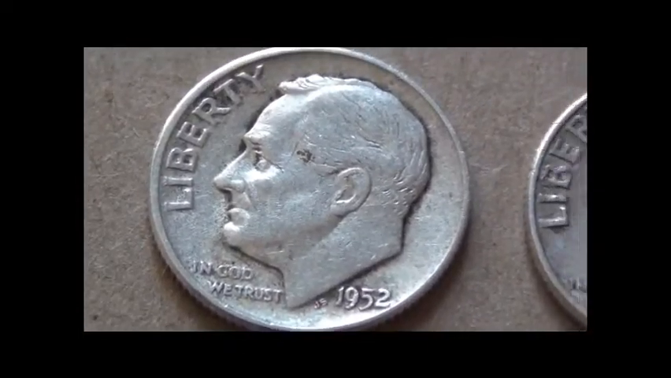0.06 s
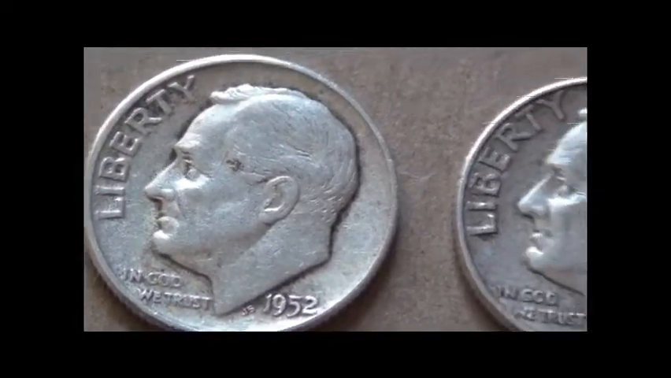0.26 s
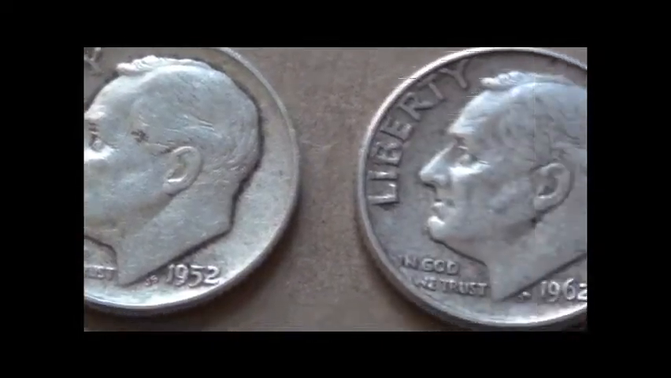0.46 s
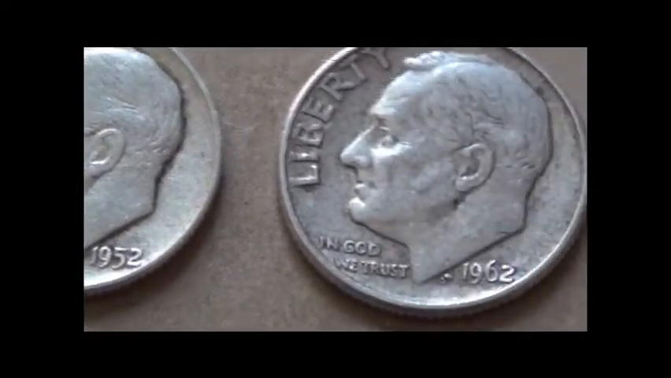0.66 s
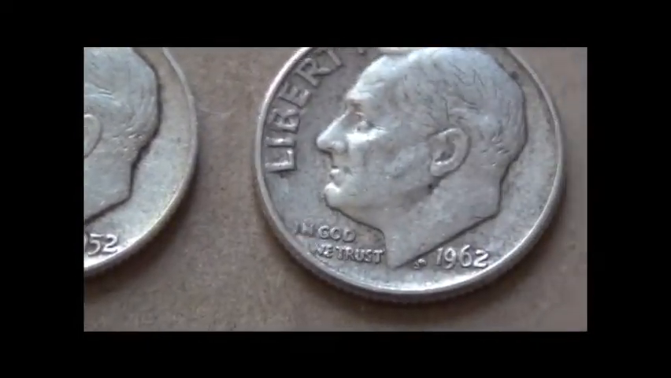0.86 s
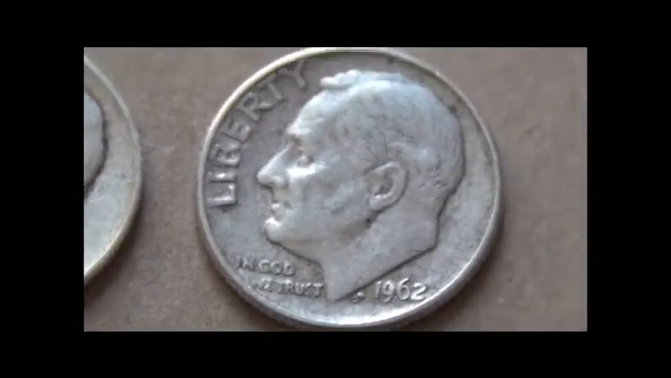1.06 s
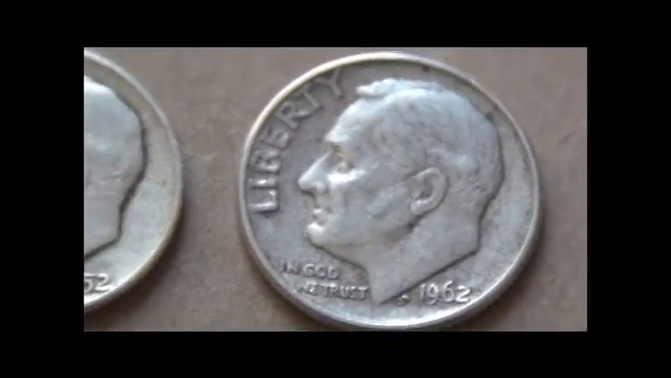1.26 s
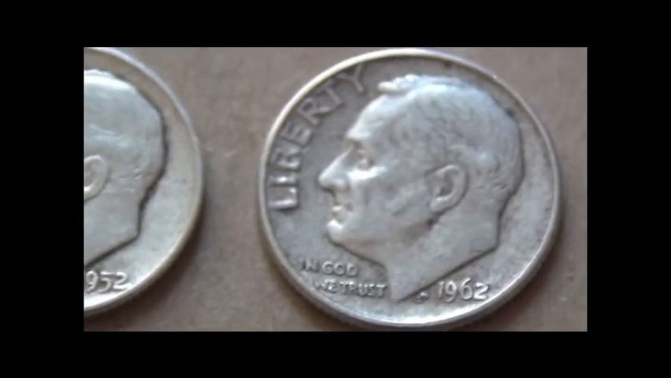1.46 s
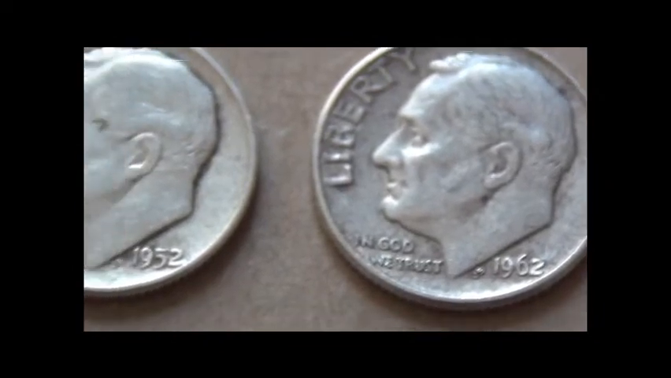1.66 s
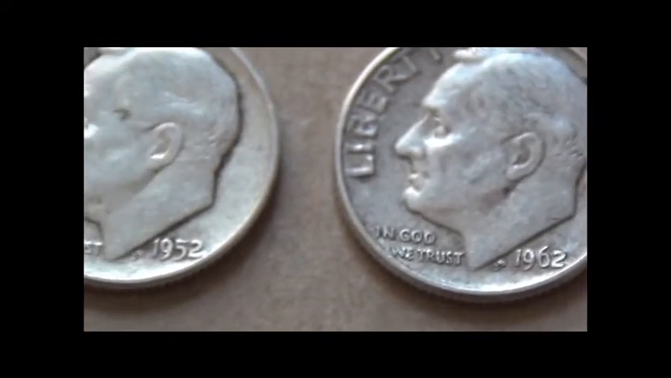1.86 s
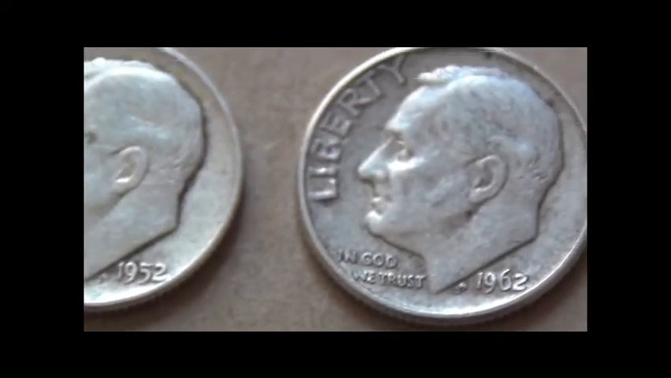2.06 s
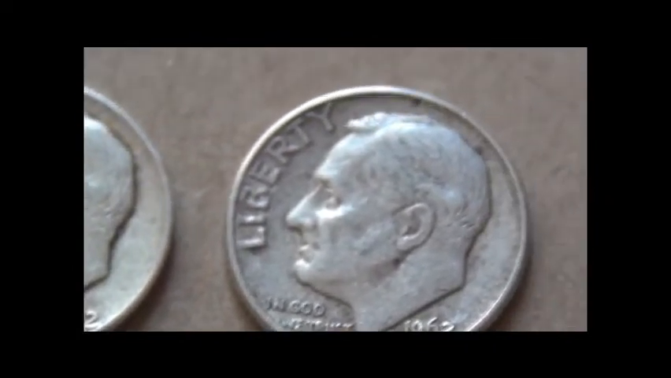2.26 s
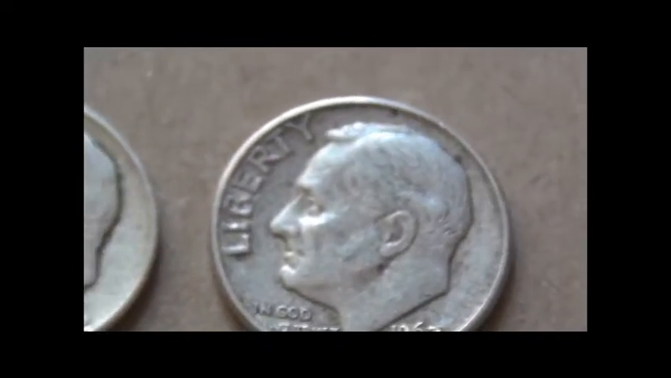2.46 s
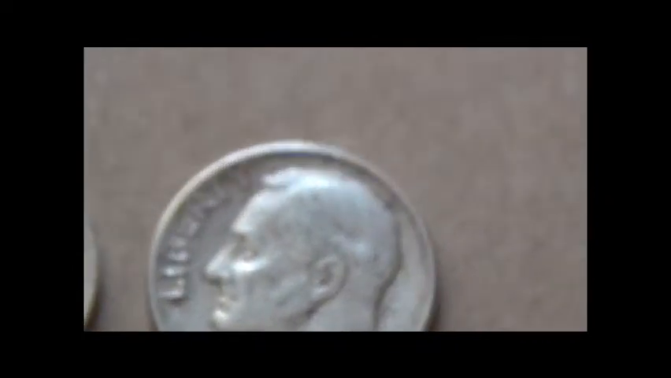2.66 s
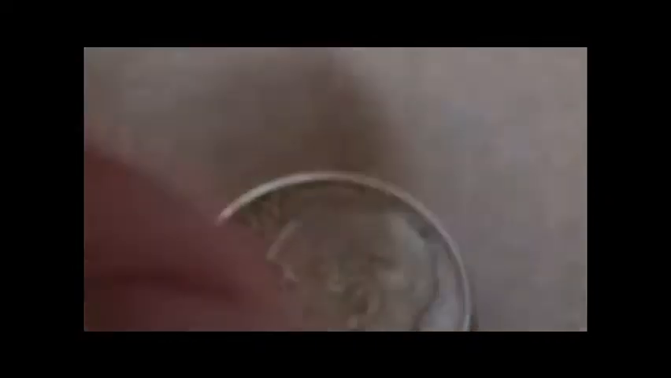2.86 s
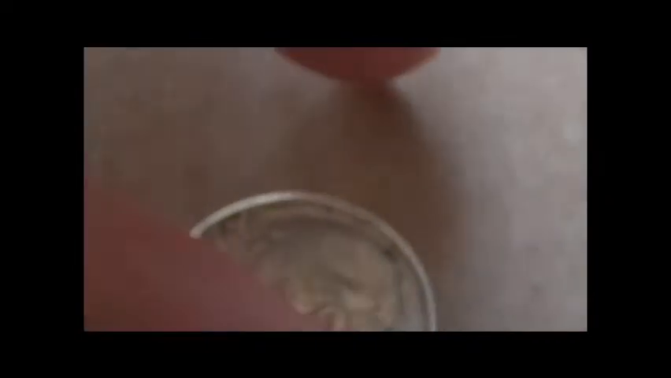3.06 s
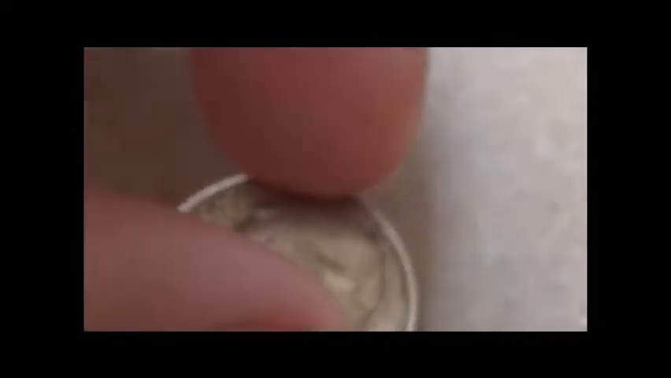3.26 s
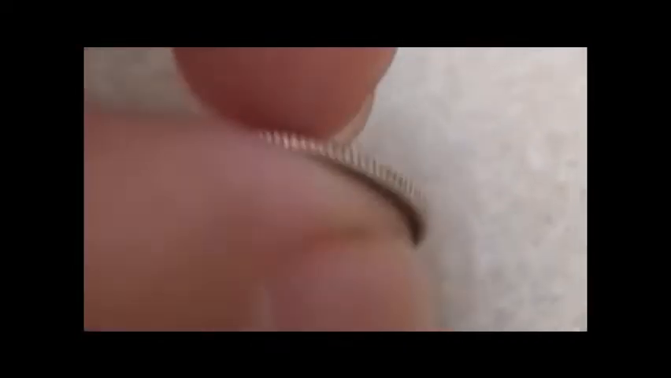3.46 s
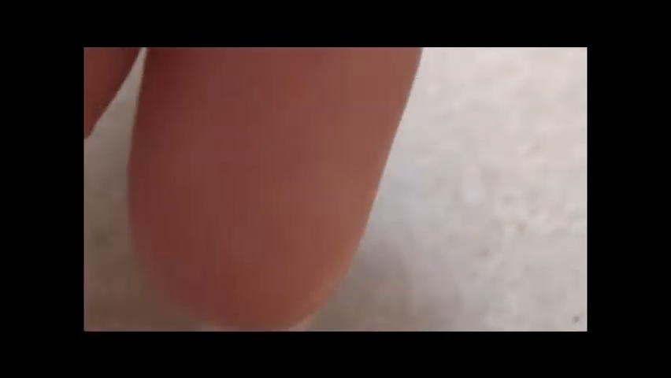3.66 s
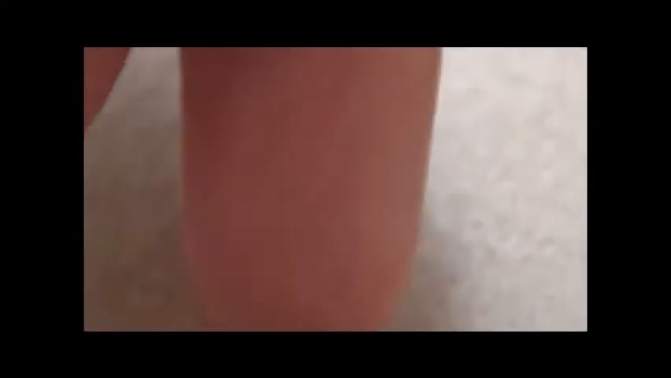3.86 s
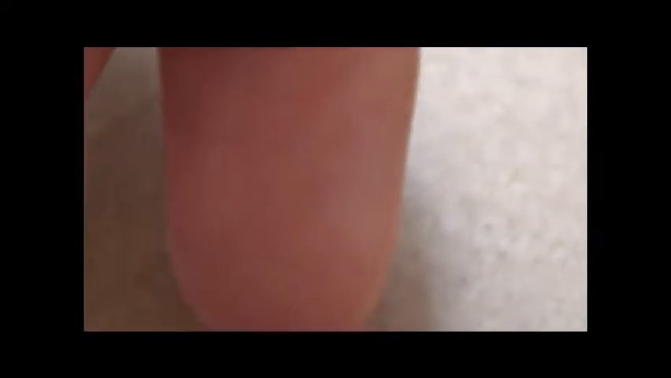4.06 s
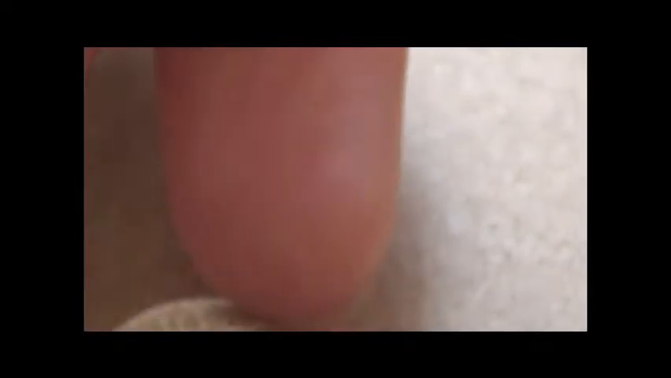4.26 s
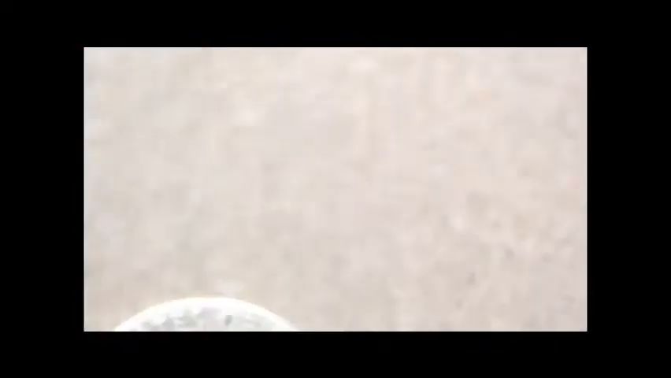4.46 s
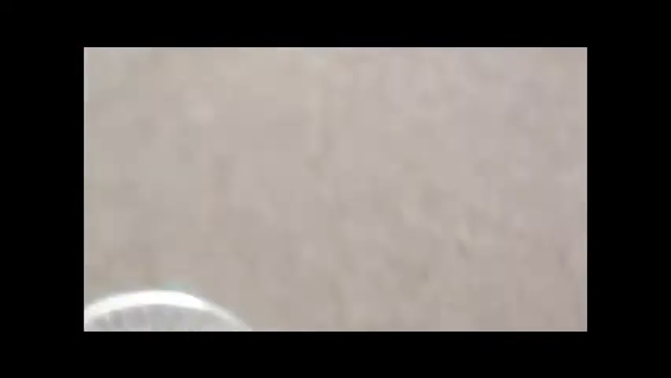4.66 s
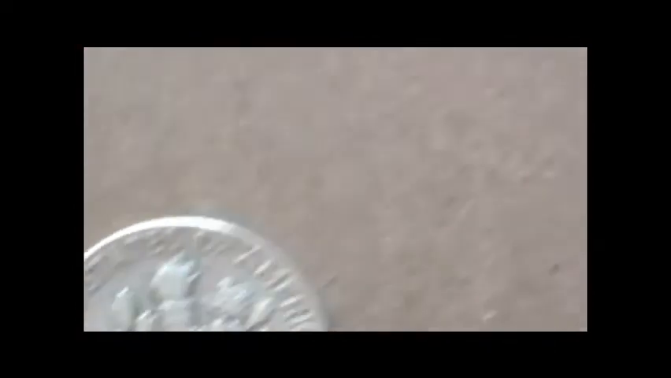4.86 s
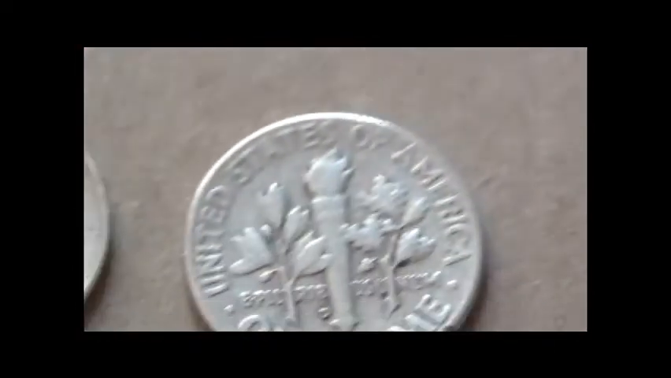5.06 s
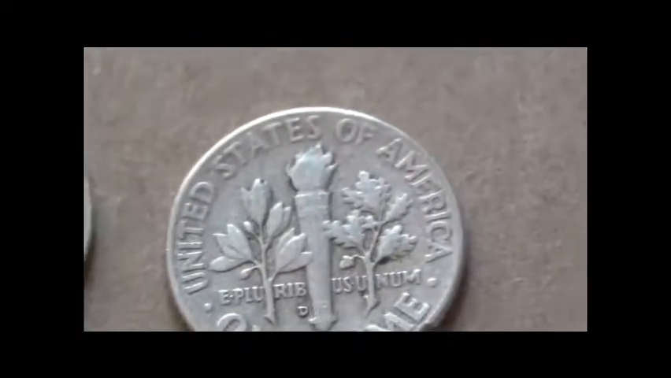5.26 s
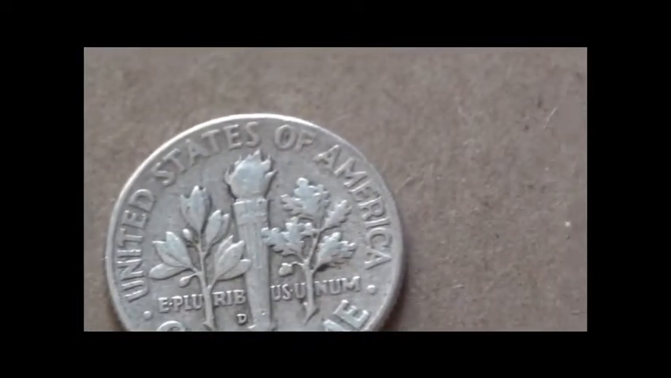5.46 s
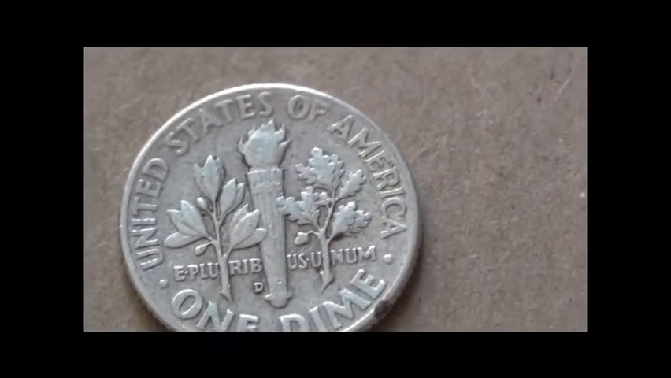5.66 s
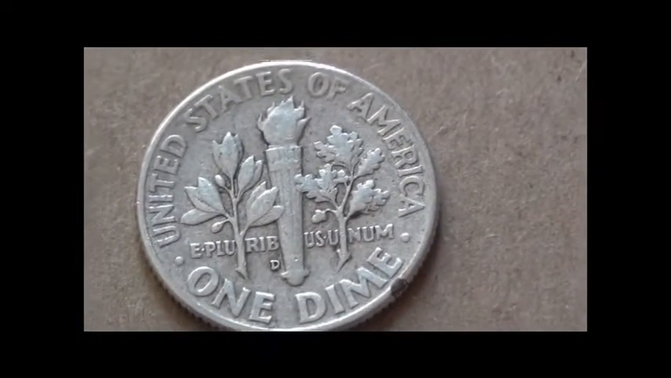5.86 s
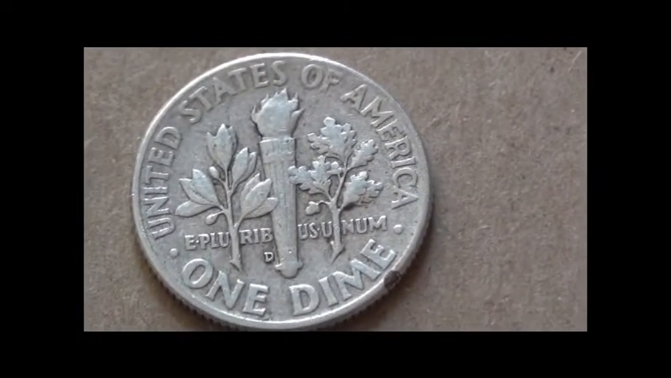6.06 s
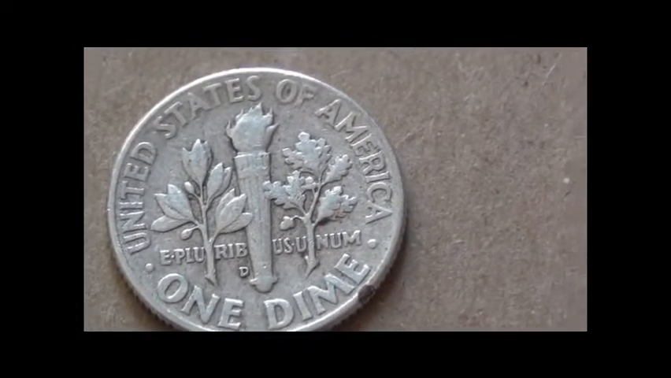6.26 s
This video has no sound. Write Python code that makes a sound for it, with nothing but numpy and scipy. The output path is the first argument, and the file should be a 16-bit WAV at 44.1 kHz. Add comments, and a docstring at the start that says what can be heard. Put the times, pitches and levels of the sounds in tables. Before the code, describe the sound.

Quiet room hiss with faint camera whirr, a dull bump, then a small coin scraped, knocked and dropped on cardboard with a tiny bright chime.

```python
"""A quiet room, a sheet of cardboard on a table, a hand-held camera close by with its own stereo microphone.
A small silver coin is picked up, turned over and dropped: knocks and slipping clicks ring the modes of the board,
and the coin's own modes chime briefly when it falls free. Skin brushes along as shaped noise.
Low pushes thud through the support, the camera's case ticks, its lens drive sings as it refocuses twice, its electronics pip.
The drop pushes the limiter down, so the steady hiss stays lower after it."""
import sys
import numpy as np
from scipy import signal
from scipy.fft import rfft, irfft
from scipy.io import wavfile
from scipy.ndimage import uniform_filter1d, minimum_filter1d

SR = 44100
rng = np.random.default_rng(int(sys.argv[2]) if len(sys.argv) > 2 else 0)


def bounce(signal):
    """Save signal as a 16-bit WAV file at the path given by the first command-line argument."""
    frames = np.transpose(np.atleast_2d(signal))
    limited = np.clip(frames, -1, 1)
    pcm = np.round(limited * 32767).astype(np.int16)
    wavfile.write(sys.argv[1], SR, pcm)


N = 277830
TIME = np.arange(N) / SR  # s
BIN_HZ = np.arange(N // 2 + 1) * SR / N

# Modes of the cardboard on the table. Each row: frequency in Hz, width in Hz, gain in dB.
BOARD_MODES = [(97, 47, 7), (227, 62, 16), (313, 28, 15.5), (450, 26, 1), (554, 136, 17),
               (669.6, 76.5, 23.5), (726, 16, 14), (1266, 104, 11.5), (1460, 270, 18), (1900, 416, 10),
               (2400, 610, 11.5), (3020, 190, 7.5), (4800, 1060, 7), (6740, 650, 4.5), (8780, 1550, 2),
               (13700, 2100, -42)]
# Coin and fingers strike the board. Each row: time in seconds, strength in dB, weight behind the blow in dB,
# hardness in dB per octave.
BOARD_KNOCKS = [(2.492, -33, -7, 3.5), (2.6550, -31, 1, -2.5), (2.9470, -11, 5.5, -10),
                (3.0827, -21.5, 2, -4), (3.1777, -0.5, 5.5, -2), (3.3967, -13, -14, -2.5),
                (3.4726, -5, 6.5, -7.5), (3.5660, -23.5, 13, -2), (3.7530, -20.5, 14.5, -23),
                (3.7580, -19, 3, -22), (3.7770, 10.5, -6.5, -4), (3.8018, 8.5, -10, -3),
                (3.8687, -16, 8.5, -12), (3.8905, -12, 6.5, -28), (4.21, -39, -10, 7), (4.2870, -27, -2, 1),
                (4.3430, -25, -12, -7.5)]
# Rim and fingertips slide on the board. Each row: time of the height in seconds, level in dB,
# rise in seconds, fall in seconds, brightness in dB per octave.
RIM_STROKES = [(3.04, -43, 0.021, 0.0055, -2), (3.173, -31, 0.023, 0.0097, -1),
               (3.262, -49, 0.019, 0.019, 2.5), (3.415, -21, 0.013, 0.0019, 1),
               (3.5, -44.5, .008, 0.0057, 0.5), (3.578, -25.5, 0.0047, 0.018, 0),
               (3.682, -32, 0.022, 0.019, -2.5), (3.755, -37, 0.0031, 0.0055, -2),
               (3.791, -31, 0.0073, 0.018, -1), (3.897, -43.5, 0.044, 0.021, 0.5),
               (4.035, -49.5, 0.016, 0.019, 0), (4.205, -45, 0.024, 0.045, 0)]
# Modes of the free coin. Each row: frequency in Hz, time to die by 60 dB in seconds.
COIN_MODES = [(8640, 0.11), (8885, 0.11), (14960, 0.081)]
# Where the coin is struck decides which mode chimes. Each row: time in seconds, level in dB of each of the three modes.
COIN_CHIMES = [(3.776, -32.5, -35, -27), (3.8018, -41, -48, -50)]
# The hand brushes lightly along. Each row: time of the height in seconds, level in dB, rise in seconds, fall in seconds.
HAND_BRUSHES = [(.77, -52, 0.07, 0.063), (3.105, -53.5, 0.014, 0.018), (4.849, -57.5, 0.026, 0.029),
                (5.07, -50.5, 0.067, 0.09)]
# Spectrum of the brushing skin. Each row: frequency in Hz, relative density in dB per Hz.
BRUSH_SPECTRUM = [(60, -7), (300, 13), (900, 1), (1700, 4.5), (3500, 3.5), (6000, 2), (11000, 4),
                  (16000, -11)]
# Low pushes through the support: bumps of the camera, a rub of the hand, and the low body of two board knocks.
# Each row: time in seconds, strength in dB, centre of the push's spectrum in Hz.
LOW_PUSHES = [(0.714, -22, 300), (1.627, 2, 435), (1.638, -5, 450), (1.639, -0.5, 60), (1.6842, -10, 750),
              (2.489, -16.5, 453), (2.9470, -6, 265.5), (4.838, -28, 105)]
# Resonances of the support. Each row: frequency in Hz, width in Hz of each of two passes, gain in dB.
SUPPORT_MODES = [(67.4, 29.6, 33.1), (133, 103, 25.2), (178, 136, 22.8), (321, 54, 22.7), (402, 310, 8.9),
                 (826, 260, 15), (1340, 410, 2)]
# The camera's case ticks. Each row: time in seconds, strength in dB, brightness in dB per octave.
CASE_TICKS = [(0.978, -18.5, 6.5), (1.6287, -1, -3), (1.64, -12, -2), (1.755, -20, 4)]
# Resonances of the case. Each row: frequency in Hz, half the width in Hz of each of two passes, gain in dB.
CASE_MODES = [(1420, 330, -1), (1830, 280, -4), (2850, 190, 6.5), (8560, 350, 2.5), (12600, 3700, -6.5)]
# The lens drive refocuses. Each row: start in seconds, length in seconds, level in dB, dying away in dB per second.
FOCUS_DRIVES = [(0.053, 0.76, -58, 53), (4.263, 1.36, -59, 30)]
# Resonances of the lens drive. Each row: frequency in Hz, half the width in Hz of each of two passes, relative gain in dB.
LENS_RESONANCES = [(903.7, 29, -0.5), (1247, 41, -20)]
# Drift of the faint electronic pips. Each row: time in seconds, pitch in Hz, mean rms level in dB at the pip's height.
PIP_DRIFT = [(0, 2687, -63), (2.5, 2783, -58.5), (4.0, 2524, -53), (5.05, 2610, -58.5), (5.33, 2615, -53),
             (5.6, 2727, -57), (6.3, 2740, -60)]
# How fast the room dies away. Each row: frequency in Hz, time to die by 60 dB in seconds.
ROOM_DECAY = [(100, 0.38), (700, 0.19), (3000, 0.13), (14000, 0.11)]
# Room air and microphone hiss. Each row: frequency in Hz, relative density in dB per Hz.
HISS_SPECTRUM = [(15, -38), (25, -17.5), (76, -1.5), (148, -5), (228, 0), (500, -8.5), (604, -2.5),
                 (749, -9), (857, -3.5), (1090, -10), (1220, -7.5), (1640, -13), (2730, -12.5), (3390, -16),
                 (15800, -18)]
# Stereo width of the hiss. Each row: frequency in Hz, side minus mid in dB.
HISS_WIDTH = [(60, -45), (110, -20), (200, -18), (380, -9), (700, -5.5), (1290, -3), (2380, -4),
              (4400, -4.5), (8120, -8), (15000, -10)]

STROKE_CURVE, BRUSH_CURVE = 1.29, 1.4  # 1 = grows and lets go at a steady rate in dB, 2 = a bell
SURGE_CURVE = 0.78  # pointed, with long skirts


def knocks(body_hz=1000, edge_hz=1500):
    """A weighted blow moves the low modes of the whole sheet; a hard one reaches the high modes."""
    times, strength_db, weight_db, hardness = np.transpose(BOARD_KNOCKS)
    out = np.zeros(N)
    for hz, width, gain_db in BOARD_MODES:
        low = 1 / (1 + (hz / body_hz) ** 4)
        octaves_up = max(0, np.log2(hz / edge_hz))
        blow_db = strength_db + gain_db + weight_db * low + hardness * octaves_up
        out += sheet_mode(clicks(times, blow_db), hz, width)
    return out


def sheet_mode(x, hz, width):
    """A board mode fed through a broad band of its own builds up over a cycle and has steep skirts."""
    return resonate(resonate(x, hz, 1.2 * hz), hz, width)


def coin():
    """A close pair of coin modes beats under one higher mode; all three die away quickly."""
    times, *strengths = np.transpose(COIN_CHIMES)
    return sum(ring(clicks(times, db), hz, t60) for db, (hz, t60) in zip(strengths, COIN_MODES))


def scrapes(slips_per_s=3000, spread_db=3.0, pivot_hz=1200, shift_db=2.0, shift_s=0.0083, damping=1.46,
            fibre_db=-10, fibre_band_hz=(8300, 13500), grip_db=1.27, grip_s=0.0055):
    """Fibres catch and slip under the rim: dense uneven clicks ring the board and rustle on their own."""
    sizes = from_db(spread_db * np.minimum(rng.exponential(1, N), 3)) * rng.choice([-1, 1], N)
    slips = sizes * (rng.random(N) < slips_per_s / SR)

    powers = [swell(*stroke[:4], STROKE_CURVE) for stroke in RIM_STROKES]
    pressure = sum(powers) + 1e-12
    bright = sum(power * stroke[4] for power, stroke in zip(powers, RIM_STROKES)) / pressure

    plain, tilted = 0, 0
    for hz, width, gain_db in BOARD_MODES:
        # the moving contact favours now one mode, now another, and the pressing hand damps them all
        contact = from_db(gain_db + shift_db * wander(shift_s))
        mode = contact * sheet_mode(slips, hz, damping * width)
        plain = plain + mode
        tilted = tilted + mode * from_db(bright * np.clip(np.log2(hz / pivot_hz), -1, 2))

    fibres = signal.butter(2, fibre_band_hz, "band", fs=SR, output="sos")
    rustle = from_db(fibre_db + 2 * bright) * signal.sosfilt(fibres, slips * rng.choice([-1, 1], N))
    grip = from_db(grip_db * wander(grip_s))  # the grip of the rim is uneven
    return np.sqrt(pressure) * grip * (tilted + rustle) / np.std(plain)


def brushes():
    """Skin slides too softly for single slips to stand out, so it is smooth coloured noise."""
    skin = rms_one(coloured(at_hz(BRUSH_SPECTRUM, BIN_HZ)))
    return np.sqrt(sum(swell(*brush, BRUSH_CURVE) for brush in HAND_BRUSHES)) * skin


def support_thuds():
    """Soft low pushes swell into dull thuds through the resonances of the support."""
    pushes = sum(resonate(clicks([s], db), hz, hz) for s, db, hz in LOW_PUSHES)
    return -sum(from_db(db) * resonate_twice(pushes, hz, width) for hz, width, db in SUPPORT_MODES)


def case_ticks(tick_s=0.001, tick_db=-16, pivot_hz=5000):
    """Short dying bursts of noise ring the camera's case as gritty ticks."""
    times, strength_db, bright = np.transpose(CASE_TICKS)
    grain, case = rng.standard_normal(N), 0
    for hz, width, db in CASE_MODES:
        hits = clicks(times, strength_db + db + bright * np.log2(hz / pivot_hz))
        decay = signal.lfilter([1], [1, -np.exp(-1 / (tick_s * SR))], hits + 1e-18)
        case = case + resonate_twice(decay * grain, hz, 2 * width)
    return from_db(tick_db) * case


def lens_drive(idle_db=-78):
    """Random jitter of the drive excites its resonances, so it sings unsteadily over a faint idle."""
    effort = np.sqrt(from_db(idle_db) ** 2 + sum(focus_run(*run) for run in FOCUS_DRIVES))
    jitter = rng.standard_normal(N)
    song = sum(from_db(db) * resonate_twice(jitter, hz, 2 * width) for hz, width, db in LENS_RESONANCES)
    return effort * rms_one(song)


def focus_run(start, length, db, dying_db_per_s, attack_db_per_s=400,
              first_surge_s=0.311, surge_gap_s=0.2, surge_width_s=0.018, surge_db=11):
    """Power of one run: a fast start and a hold with two surges, past the focus and back, then it dies away."""
    t = TIME - start
    hold_db = db + np.minimum(0, np.minimum(attack_db_per_s * t, dying_db_per_s * (length - t)))
    power = from_db(hold_db) ** 2
    for k in range(2):
        height_s = start + first_surge_s + k * surge_gap_s
        power = power + swell(height_s, db + surge_db, surge_width_s, surge_width_s, SURGE_CURVE)
    return power


def camera_electronics(frame_hz=30.02, first_pip_s=0.008, pip_s=0.0012, uneven_db=2.0,
                       whine_hz=15734, whine_db=-73):
    """A short sine pip of uneven level sounds once a picture frame, over a steady high whine."""
    times, pitch_hz, level_db = np.transpose(PIP_DRIFT)
    pip_hz, pip_db = np.interp(TIME, times, pitch_hz), np.interp(TIME, times, level_db)
    frames = (TIME - first_pip_s) * frame_hz
    frame = np.round(frames).astype(int)
    count = frame.max() + 1
    gate = np.exp(-.5 * ((frames - frame) / frame_hz / pip_s) ** 2)
    phase = 2 * np.pi * (np.cumsum(pip_hz) / SR + rng.random(count)[frame])
    level = from_db(pip_db + uneven_db * rng.standard_normal(count)[frame])
    whine = from_db(whine_db) * np.sin(2 * np.pi * whine_hz * TIME)
    return np.sqrt(2) * (gate * level * np.sin(phase) + whine)  # levels are rms


def room(x, near_db=-17, near_s=0.0026, far_db=-19, build_s=0.0034, side_db=1, apart_hz=900):
    """Quick reflections from hand and table, then a faint tail that dies sooner in the treble."""
    t = TIME[:SR // 2]
    edges = np.geomspace(60, 17000, 9)
    tail = 0
    for low, high in zip(edges, edges[1:]):
        band_filter = signal.butter(2, [low, high], "band", fs=SR, output="sos")
        band = signal.sosfilt(band_filter, rng.standard_normal((2, len(t))))
        tail = tail + band * np.exp(-np.log(1000) * t / at_hz(ROOM_DECAY, np.sqrt(low * high)))
    tail = tail * (1 - np.exp(-t / build_s))
    near = rng.standard_normal((2, len(t))) * t * np.exp(-2 * t / near_s)
    response = (from_db(near_db) * rms_one(near) + from_db(far_db) * rms_one(tail)) / np.sqrt(len(t))
    mid, side = signal.fftconvolve(x[None], response, axes=1)[:, :N]
    # long waves reach both microphone ports alike
    side = signal.sosfilt(signal.butter(1, apart_hz, "high", fs=SR, output="sos"), side)
    return mid + from_db(side_db) * side * [[1], [-1]]


def hiss(mid_db=-53.5):
    """Steady air and microphone noise, mostly common to both sides."""
    spectrum_db = at_hz(HISS_SPECTRUM, BIN_HZ)
    mid = coloured(spectrum_db)
    side = coloured(spectrum_db + at_hz(HISS_WIDTH, BIN_HZ))
    return from_db(mid_db) * (mid + side * [[1], [-1]]) / np.std(mid)


def swell(s, db, rise, fall, curve):
    """Power that grows to its height and lets go; rise and fall are the times to 1/e of it."""
    away = np.maximum((s - TIME) / rise, (TIME - s) / fall)
    return from_db(db) ** 2 * np.exp(-np.minimum(away ** curve, 50))


def wander(span_s):
    """Slow chance of rms 1 that changes over about the given time."""
    size = max(int(span_s * SR), 1)
    return rms_one(uniform_filter1d(uniform_filter1d(rng.standard_normal(N), size), size))


def clicks(times, db):
    """One impulse at each time."""
    out = np.zeros(N)
    out[np.round(np.asarray(times) * SR).astype(int)] = from_db(db)
    return out


def resonate(x, hz, width):
    """A resonance with gain 1 at its top."""
    r = np.exp(-np.pi * width / SR)
    feedback = [1, -2 * r * np.cos(2 * np.pi * hz / SR), r * r]
    return signal.lfilter(np.array([1, 0, -1]) * (1 - r * r) / 2, feedback, x + 1e-18)


def resonate_twice(x, hz, width):
    """Two equal resonances in a row swell before they ring."""
    return resonate(resonate(x, hz, width), hz, width)


def ring(x, hz, t60):
    """A unit click sets a sine of height 1 ringing."""
    r, w = np.exp(-np.log(1000) / (t60 * SR)), 2 * np.pi * hz / SR
    return signal.lfilter([0, np.sin(w)], [1, -2 * r * np.cos(w), r * r], x + 1e-18)


def coloured(gain_db):
    """Noise with the given dB at each FFT bin."""
    return irfft(rfft(rng.standard_normal(N)) * from_db(gain_db), N)


def at_hz(points, hz):
    """Read a curve on a log-frequency axis."""
    f, value = np.transpose(points)
    return np.interp(np.log(hz + 1), np.log(f), value)


def from_db(db):
    """Decibels to gain."""
    return 10 ** (np.asarray(db) / 20)


def rms_one(x):
    """Scale to unit rms."""
    return x / np.sqrt(np.mean(x ** 2) + 1e-20)


def scene(pan_db=0.55):
    """Coin and hand lie just left of centre; thuds and camera are in the middle."""
    handling = knocks() + coin() + scrapes() + brushes()
    thuds_and_ticks = support_thuds() + case_ticks()
    direct = handling * from_db([[pan_db], [-pan_db]]) + thuds_and_ticks
    camera = lens_drive() + camera_electronics()
    return direct + camera + room(handling + thuds_and_ticks) + hiss()


def limiter(x, ceiling_db=-11, release_db_per_s=0.96):
    """Peaks of the middle band over the ceiling turn the gain down at once; it creeps back over seconds."""
    middle_band = signal.butter(2, [1300, 6000], "band", fs=SR, output="sos")
    sensed = signal.sosfilt(middle_band, x.mean(axis=0))
    over_db = np.maximum(20 * np.log10(np.abs(sensed) + 1e-9) - ceiling_db, 0)
    released_db = release_db_per_s * TIME
    held_db = np.maximum.accumulate(over_db + released_db) - released_db
    # look a little ahead, then smooth the step
    gain_db = uniform_filter1d(minimum_filter1d(-held_db, size=129), size=65)
    return x * from_db(gain_db)


def record(dry, cutoff_hz=16000):
    """The limiter, then a steep cut of the top."""
    top_cut = signal.ellip(12, .1, 70, cutoff_hz, fs=SR, output="sos")
    return signal.sosfilt(top_cut, limiter(dry))


dry = scene()
out = record(dry)
bounce(out)
```